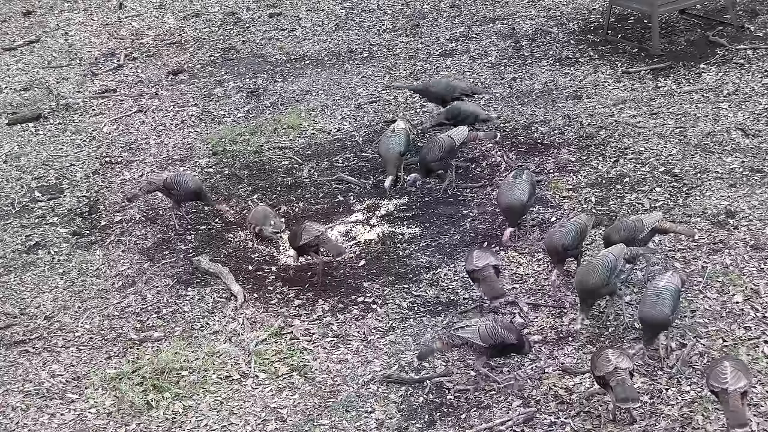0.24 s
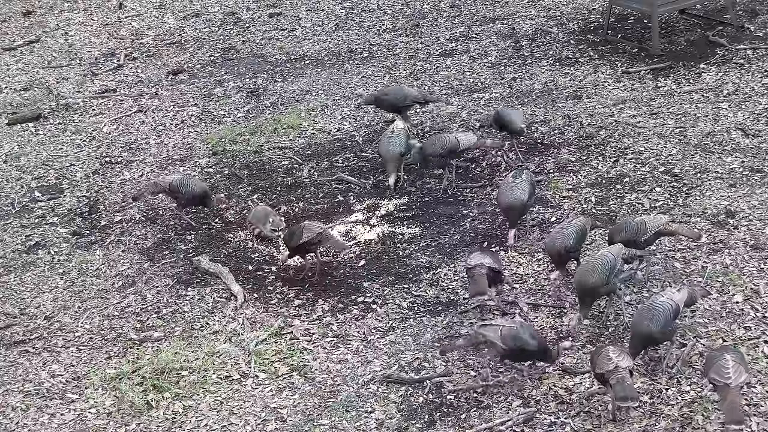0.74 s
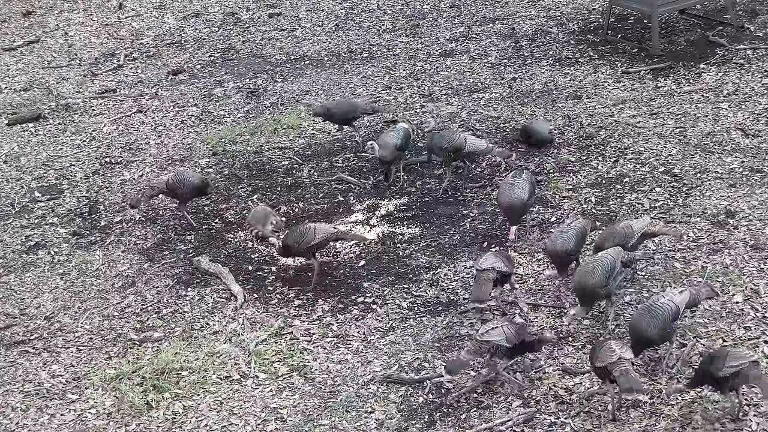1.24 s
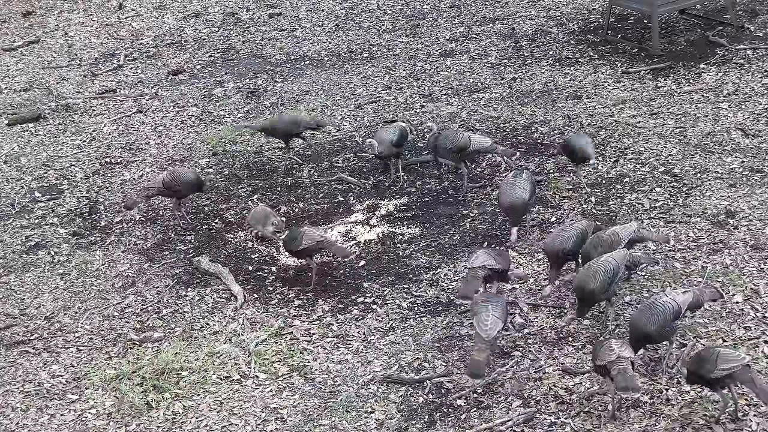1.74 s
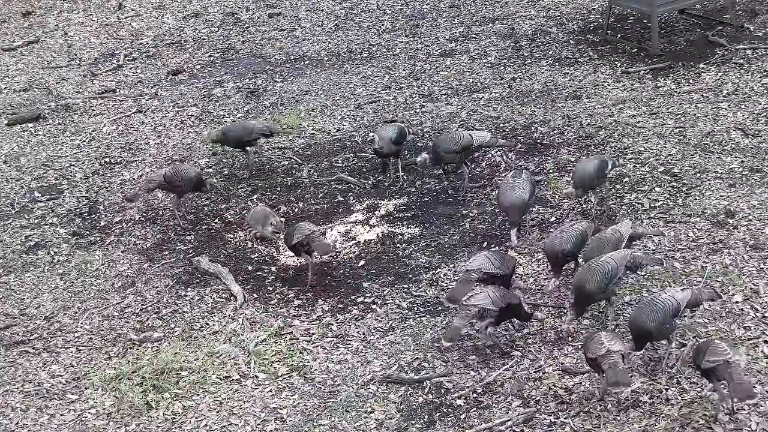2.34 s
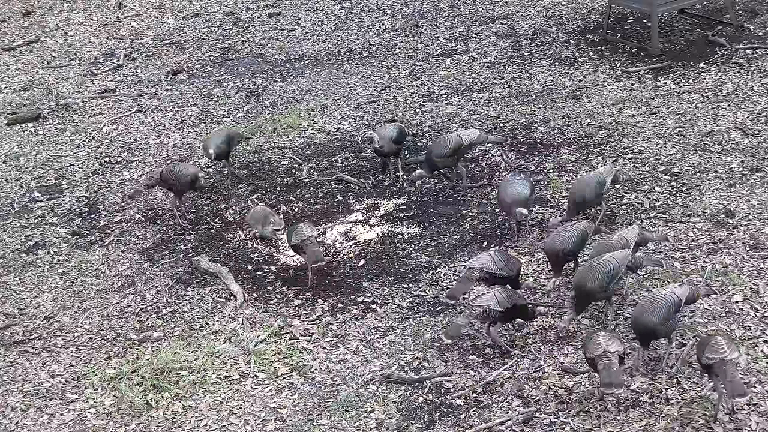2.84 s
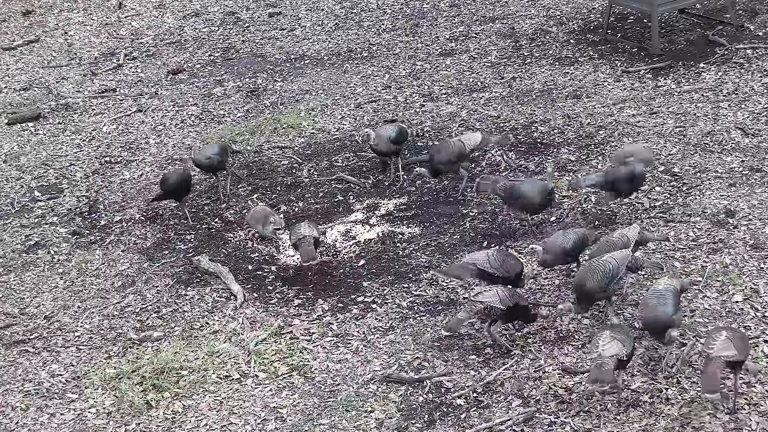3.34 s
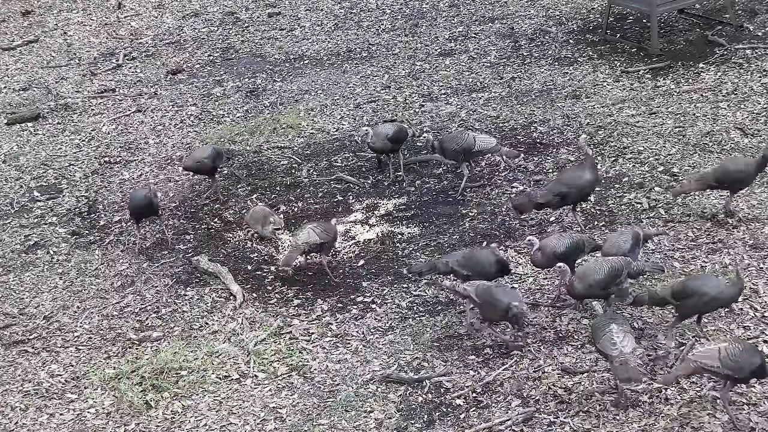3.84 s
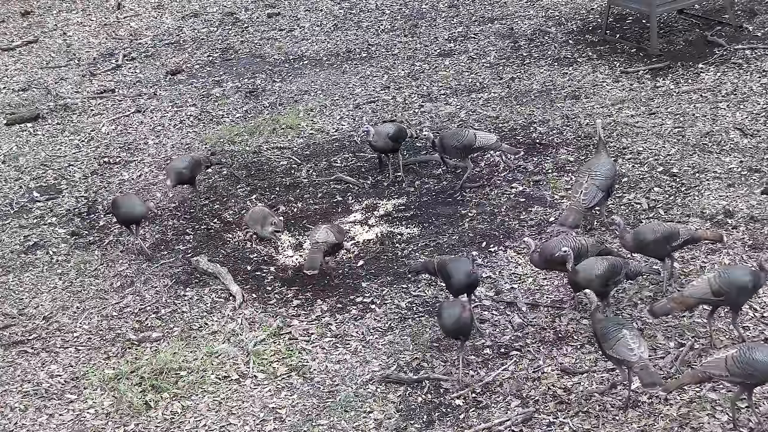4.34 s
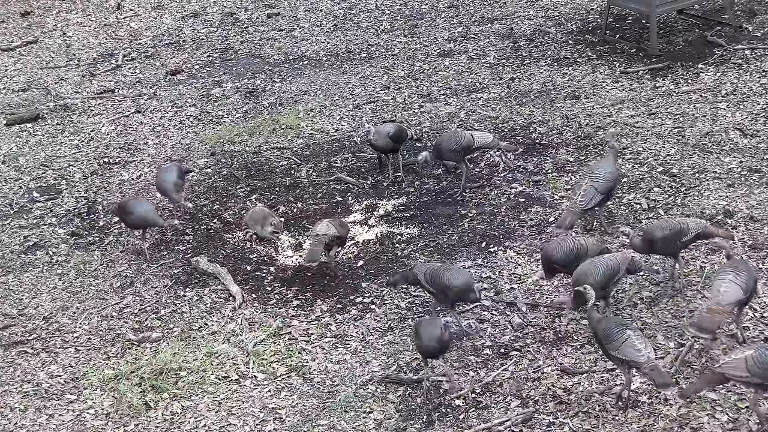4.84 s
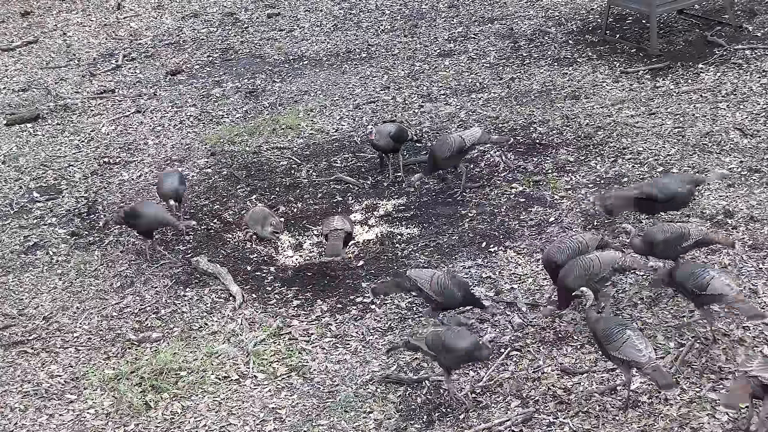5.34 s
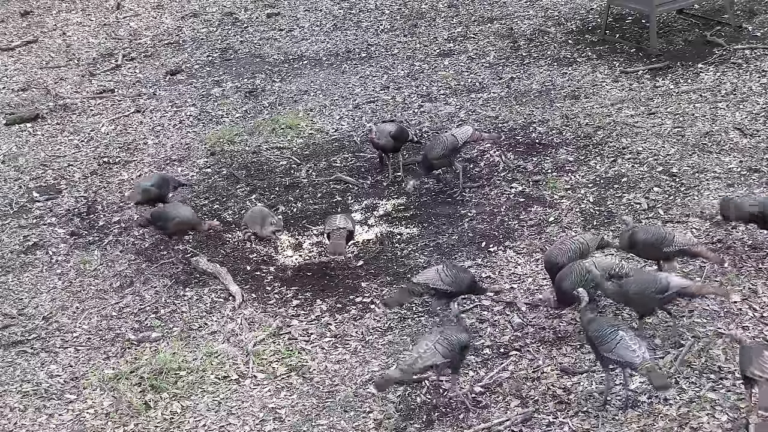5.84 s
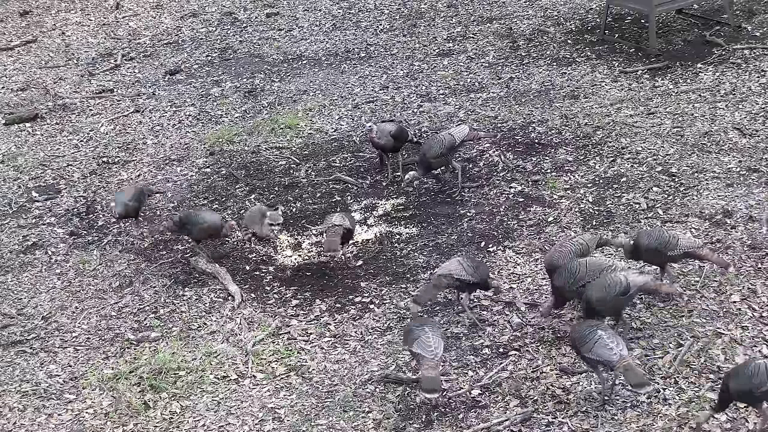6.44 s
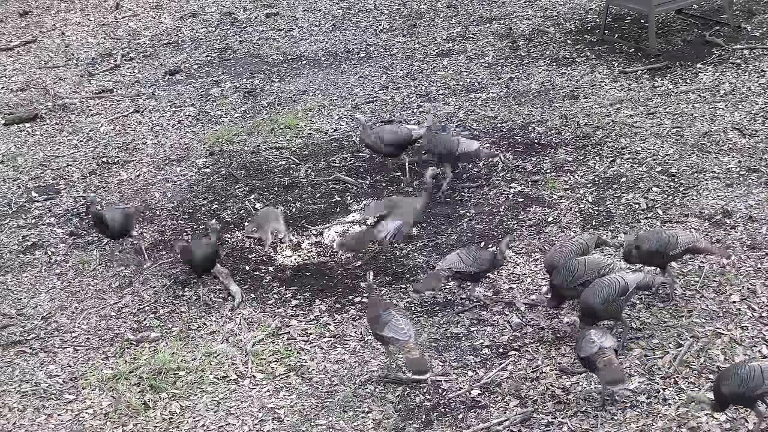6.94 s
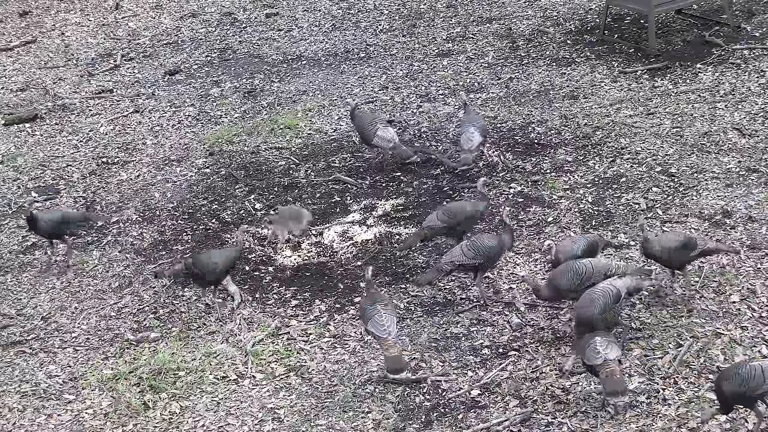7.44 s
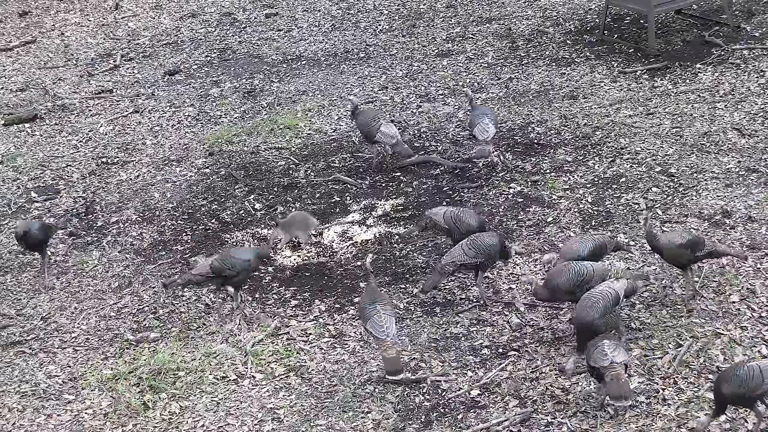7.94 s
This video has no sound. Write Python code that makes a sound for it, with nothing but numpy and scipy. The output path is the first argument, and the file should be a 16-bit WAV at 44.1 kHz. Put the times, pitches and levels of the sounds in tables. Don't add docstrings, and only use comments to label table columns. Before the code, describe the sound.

A feeding turkey flock rustles crisp woodland litter with uneven steps and pecks, quiet hen calls, one quick feather flap, faint low wind.

```python
import sys
import numpy as np
from scipy import signal
from scipy.fft import rfft, irfft
from scipy.io import wavfile

SR = 44100
rng = np.random.default_rng(int(sys.argv[2]) if len(sys.argv) > 2 else 0)


def generate_wav(sig):
    pcm = np.round(np.clip(np.atleast_2d(sig).T, -1, 1) * 32767).astype(np.int16)
    wavfile.write(sys.argv[1], SR, pcm)


def undo_db(level):
    steps = np.asarray(level, float) / 20
    return 10 ** steps


N = 361619

# (frequency [Hz], level [dB per Hz])
LEAF_TONE = [(710, -35), (1200, -2.5), (1490, -6.5), (1790, -0.5), (2180, 0), (2980, 1), (4260, -1.5),
             (4860, 1), (5900, -0.5), (6720, -3), (7660, 0.5), (8530, 0.5), (10500, -10.5), (13500, -7.5),
             (16000, -26)]
# (frequency [Hz], level [dB per Hz])
SOIL_TONE = [(150, -12), (400, -4), (900, -2), (1600, -4.5), (2500, -19.5)]


def evened(x):
    return x / np.sqrt(np.mean(x ** 2) + 1e-20)


def read(points, hz):
    f, value = np.transpose(points)
    return np.interp(np.log(hz + 1), np.log(f + 1), value)


def curve(rows, order):
    rows = np.array(rows)
    return np.interp(np.arange(N) / SR, rows[:, 0], rows[:, order])


def add(mix, s, sound):
    part = mix[round(s * SR):][:len(sound)]
    part += sound[:len(part)]


def coloured(x, points):
    log_gain = np.log(undo_db(read(points, abs(np.fft.fftfreq(4096, 1 / SR)))))
    phase = -signal.hilbert(log_gain).imag
    taps = np.fft.ifft(np.exp(log_gain + 1j * phase)).real[:2048]
    return signal.oaconvolve(x, taps / np.linalg.norm(taps))[:len(x)]


def ring(x, hz, width_hz):
    return signal.lfilter(*signal.iirpeak(hz, hz / width_hz, SR), x)


def crackle(per_s, spread_db, grain_s):
    draw, size, noise = rng.random(N), rng.exponential(1, N), rng.standard_normal(N)
    snaps = (draw < per_s / SR) * undo_db(spread_db * np.minimum(size, 3))
    puffs = signal.lfilter([1], [1, -np.exp(-1 / (grain_s * SR))], snaps)
    return evened(noise * puffs)


def wander(rate_hz):
    hz = np.fft.rfftfreq(N, 1 / SR)
    return evened(irfft(rfft(rng.standard_normal(N)) / (1 + (hz / rate_hz) ** 2), N))


def air():
    # (frequency [Hz], level [dB per Hz])
    rumble = [(15, -46), (25, -13), (43, -6.5), (76, -9.5), (106, -12.5), (178, -14), (273, -19),
              (312, -19.5), (649, -26.5), (743, -28), (1010, -29), (2500, -56.5), (3250, -57), (5500, -120)]
    # (time [s], wind pressure on the microphone [dB], far wash bass [dB])
    gusts = [(0.0, -47, -83), (0.23, -31, -46.5), (0.46, -54, -50.5), (0.75, -35.5, -50), (0.96, -52, -48),
             (1.19, -37.5, -51.5), (1.55, -48, -49.5), (2.03, -39.5, -54.5), (2.35, -54.5, -51.5),
             (2.72, -46, -52), (3.59, -54.5, -48.5), (5.09, -53, -52.5), (6.21, -55, -52), (6.87, -53, -48),
             (7.6, -48, -51.5), (8.2, -49.5, -52.5)]
    # (time [s], level [dB])
    hum_swell = [
        (6.7, -51.5),
        (7.252, -52.5),
        (7.452, -74),
        (7.5, -73),
    ]
    wash, drone, wind = rng.standard_normal((3, N))

    wash = coloured(wash, rumble)
    bass = signal.sosfilt(signal.butter(2, 110, fs=SR, output="sos"), wash)
    wash = undo_db(-49.5) * (wash - bass) + undo_db(curve(gusts, order=2)) * evened(bass)

    hum_level = undo_db(curve([(6.3, -82)] + hum_swell + [(7.6, -86)], order=1) - 2.0)
    drone = hum_level * evened(ring(drone, 157, 72))

    wind = signal.sosfilt(signal.butter(3, [3, 20], "band", fs=SR, output="sos"), wind)
    return wash + drone + undo_db(curve(gusts, order=1)) * evened(wind)


def foliage():
    # (frequency [Hz], level [dB per Hz])
    hiss = [(880, -33), (1500, -3), (1900, -6), (2140, -18), (2320, -3), (3550, -13), (4920, 1.5),
            (6630, -5.5), (8080, -13), (16000, -20.5)]
    return undo_db(-64) * coloured(rng.standard_normal(N), hiss)


def stir():
    # (time [s], level [dB])
    bustle = [(0.0, -85), (0.07, -85), (0.13, -55.5), (1.5, -68), (1.63, -86), (1.72, -60.5), (2.02, -50.5),
              (2.25, -73), (2.8, -64), (3.1, -64), (3.3, -59), (4.4, -61), (6.35, -64), (6.53, -50),
              (7.0, -50), (7.06, -49.5), (7.45, -51), (8.2, -52.5)]
    # (peak time [s], level [dB], build [s], settle [s])
    rakes = [(.11, -54, 0.018, 0.082), (.46, -47, 0.013, 0.18), (0.652, -34, 0.005, 0.0085),
             (0.749, -53.5, 0.16, 0.68), (1.0, -44.5, 0.011, 0.049), (1.31, -47.5, 0.3, 0.27),
             (1.52, -45, 0.016, 0.047), (2.04, -53, 0.044, 0.87), (2.52, -45.5, 0.084, 0.11),
             (2.89, -49.5, 0.04, 0.013), (3.14, -55, 0.066, 0.0091), (3.18, -47, .01, 0.47),
             (3.49, -45.5, 0.034, 1), (3.73, -48, 0.019, 0.016), (3.77, -40.5, 0.012, 0.031),
             (3.995, -44, 0.21, 0.079), (4.36, -45.5, 0.31, 0.079), (4.53, -47, 0.024, 0.058),
             (4.71, -51, 0.2, 0.23), (5.0, -42.5, 0.052, 0.027), (5.15, -49.5, 0.2, 0.041),
             (5.19, -41.5, 0.013, 0.049), (5.56, -45, 0.53, 0.069), (5.95, -45.5, 0.41, 0.058),
             (6.09, -47, 0.16, 0.27), (6.3, -45.5, 0.042, 0.065), (6.94, -59, .02, 0.098),
             (7.29, -46.5, 0.34, 0.17), (7.5, -47.5, 0.041, 0.067), (7.92, -58, 0.015, 0.13)]
    rake_db = 12
    t, power = np.arange(0, N / SR, .002), 0
    for s, db, build, settle in rakes:
        away = np.maximum((s - t) / build, (t - s) / settle)
        power = power + undo_db(2 * (db - rake_db * away))
    return np.sqrt(np.interp(np.arange(N) / SR, t, power) + undo_db(2 * curve(bustle, order=1)))


def steps():
    # (time [s], peak [dB], leaf ring [Hz], thud [dB])
    treads = [(.079, -44, 1810, 2.5), (.1006, -30.5, 6430, -14), (.152, -51, 2500, -3),
              (.248, -42, 1580, -7), (.317, -44, 8170, -2), (.587, -42, 2640, -4),
              (.6452, -24.5, 2660, -11), (1.2335, -29.5, 4870, -9), (1.2565, -33, 2720, -7),
              (1.29, -38, 2840, -4), (1.709, -33.5, 4430, -12), (1.9165, -30.5, 2660, -11),
              (1.947, -41, 2540, -2.5), (3.417, -31.5, 2330, -20), (3.4884, -29, 1750, -10),
              (4.9865, -30.5, 2600, -10), (5.2873, -35, 2800, -10), (5.3212, -27.5, 2770, -8.5),
              (5.3896, -34, 7870, -6.5), (5.8056, -27.5, 6300, -8.5), (6.088, -25.5, 5070, -10),
              (6.319, -37, 2600, -8), (6.5165, -54, 3000, 3), (6.6647, -26.5, 7450, -9),
              (6.7505, -39, 4800, -3), (6.8348, -33, 1730, -1), (6.933, -27.5, 2950, -6.5),
              (7.3102, -29, 5150, -9), (7.6564, -35, 3270, -12)]
    # (time [s], peak [dB], leaf ring [Hz])
    crunches = [(0.4657, -26, 4850), (.9895, -31.5, 3220), (1.097, -39, 7940), (1.149, -37, 7590),
                (1.158, -44, 3220), (1.313, -35, 4390), (2.2064, -31, 2960), (2.5073, -28, 4760),
                (3.026, -49, 5000), (3.8745, -37, 6160), (4.73, -39, 8820), (4.773, -40, 2490),
                (5.2349, -36, 5010), (5.732, -37, 5060), (6.1279, -26.5, 2500), (6.2976, -31.5, 4530),
                (6.4803, -33.5, 2800), (6.96, -31.5, 8720), (7.0443, -34, 8320), (7.07, -23, 3840),
                (7.2893, -36, 8200), (7.924, -26.5, 1850)]
    # (time [s], peak [dB], leaf ring [Hz])
    tosses = [(.385, -46, 5270), (.56, -35, 7470), (1.345, -26, 5300), (1.678, -42.5, 5000),
              (2.0333, -25, 5560), (3.1165, -56, 5200), (3.129, -33.5, 7050), (3.169, -28, 2720),
              (3.334, -27, 8550), (3.58, -31, 2170), (3.719, -26.5, 4200), (3.7613, -31, 3100),
              (3.993, -31, 8250), (4.529, -34, 2820), (4.687, -35.5, 7070), (5.0548, -39, 5340),
              (5.13, -29, 3130), (5.677, -32.5, 8100), (5.855, -28.5, 5170), (6.43, -35.5, 7500),
              (6.8646, -30, 4000), (7.5257, -42, 4300), (7.738, -49, 4480), (7.855, -38, 3000),
              (7.88, -35.5, 2750)]
    # (time [s], peak [dB], leaf ring [Hz], length [s])
    drags = [(0.707, -37, 5820, 0.14), (3.888, -37.5, 5170, 0.095), (4.126, -32.5, 7700, 0.067),
             (4.262, -34.5, 8790, 0.057), (4.353, -36, 8290, 0.045), (4.829, -38.5, 4940, 0.027),
             (5.188, -25.5, 4270, 0.022), (5.488, -33.5, 7320, 0.06), (5.566, -43, 7120, 0.035),
             (5.928, -28.5, 7850, 0.025), (6.25, -37, 2880, .027), (6.714, -28.5, 2500, 0.029),
             (7.12, -28, 1500, 0.071)]
    crunch_thud_db, toss_thud_db, drag_thud_db = -13.5, -44, -14.5
    usual_db, usual_s, shorter_per_db = -30, 0.012, 0.75

    quick = treads + [(*row, crunch_thud_db) for row in crunches]
    quick = quick + [(*row, toss_thud_db) for row in tosses]
    footfalls = []
    for s, db, hz, thud_db in quick:
        length = usual_s * undo_db(shorter_per_db * (usual_db - db))
        footfalls.append((s, db, hz, thud_db, length))
    return footfalls + [(s, db, hz, drag_thud_db, length) for s, db, hz, length in drags]


def under(grains, shape):
    shaped = grains * shape
    return shaped * np.linalg.norm(shape) / (np.linalg.norm(shaped) + 1e-12)


def leaves():
    level = stir() * undo_db(-4.0 + 1.12 * wander(6.4))
    top = level * crackle(per_s=1100, spread_db=-1.0, grain_s=0.003)
    top += level * undo_db(-6.5) * crackle(per_s=300, spread_db=3, grain_s=.0004)
    low = level * undo_db(-8.5) * crackle(per_s=900, spread_db=0.0, grain_s=0.0016)
    snaps = crackle(per_s=3000, spread_db=-1.0, grain_s=0.0012)
    lumps = crackle(per_s=350, spread_db=-1.0, grain_s=0.0051)
    t = np.arange(round(.12 * SR)) / SR
    for s, db, hz, thud_db, length in steps():
        u = t / max(length, .001)
        shape = undo_db(db - 13.5) * (1 - np.exp(-u / 0.14)) * np.exp(-u ** 1.34)
        start = round(s * SR)
        part = slice(start, start + len(t))
        burst = under(snaps[part], shape)
        add(top, s, burst + undo_db(0.5) * ring(burst, hz, 0.37 * hz))
        add(low, s, undo_db(thud_db + 7.0) * under(lumps[part], shape))
    return coloured(top, LEAF_TONE) + coloured(low, SOIL_TONE)


def hens():
    # (time [s], length [s], middle [Hz], glide [Hz], level [dB])
    yelps = [(0.076, .026, 920, -130, -49), (0.1, .042, 790, -290, -46.5), (.2, .014, 830, 260, -53),
             (0.205, 0.039, 965, 0, -48), (.238, .018, 770, -240, -57), (.951, .014, 760, 400, -50),
             (.957, .028, 1060, 200, -44), (.979, .018, 1170, 60, -50), (.994, .032, 1010, -240, -50),
             (1.144, .013, 1050, 250, -47), (1.19, .02, 980, 160, -51), (1.22, .034, 1060, 300, -49),
             (1.586, 0.05, 950, 60, -50.5), (1.662, .017, 893, -22, -56), (3.34, .032, 850, -170, -54),
             (3.385, .05, 720, -150, -55), (4.957, .017, 940, 12, -54), (5.035, 0.022, 578, -50, -49),
             (5.04, .024, 1145, -200, -56.5), (8.164, .016, 930, 10, -52)]
    # (time [s], length [s], middle [Hz], glide [Hz], level [dB])
    purr = [
        (1.207, 0.015, 880, 60, -48),
        (1.258, .016, 1020, -120, -53),
        (1.276, .017, 980, 20, -48),
        (1.296, 0.022, 763, 60, -52),
        (1.312, 0.0089, 820, 80, -56),
        (1.32, 0.019, 865, -20, -50),
        (1.344, 0.015, 845, -20, -49),
        (1.358, .03, 720, -20, -52),
        (1.381, .016, 630, -120, -54),
        (1.394, 0.022, 740, 150, -56),
    ]
    # (time [s], length [s], middle [Hz], glide [Hz], level [dB])
    clucks = [
        (6.706, .007, 2120, -100, -47),
        (6.7988, .004, 2520, -100, -37),
        (6.8055, .003, 480, 0, -40),
        (6.814, .0032, 2480, -100, -43),
        (6.8358, .0072, 950, -300, -34),
        (6.8432, .003, 760, 0, -33),
        (6.852, .006, 760, -100, -42),
        (6.933, .006, 2900, -100, -40),
    ]
    arch_hz_per_s = 2700
    cluck_fade_db = -4
    out, unsteady = np.zeros(N), wander(120)
    for k, (s, length, middle_hz, glide_hz, db) in enumerate(clucks + yelps + purr):
        u = np.linspace(-1, 1, round(length * SR))
        hz = middle_hz + u * glide_hz / 2 - u ** 2 * arch_hz_per_s * length
        turn = 2 * np.pi * np.cumsum(hz) / SR
        if k < len(clucks):
            shape = signal.windows.tukey(len(u), .2) * undo_db(cluck_fade_db * u / 2)
        else:
            shape = signal.windows.tukey(len(u), .6)
        tone = np.sin(turn) + undo_db(-30) * np.sin(2 * turn)
        add(out, s, undo_db(db + .4) * shape * tone)
    return out * undo_db(1.3 * unsteady)


def snap(noise, dull):
    puff = noise * np.exp(-np.arange(len(noise)) / 14)
    click = signal.lfilter([1], [1, -np.clip(dull, -.8, .9)], puff)
    return click / np.linalg.norm(click)


def pecks():
    # (time [s], peak [dB])
    beaks = [(.3202, -30), (.4494, -44), (.4672, -28), (.6519, -32), (1.0011, -33), (1.1099, -40),
             (1.2346, -35), (1.3453, -34), (2.0323, -32), (2.3476, -45), (2.4405, -40), (3.3362, -31),
             (3.7628, -35), (3.9598, -37), (4.2636, -34), (4.8319, -38), (4.9177, -41), (5.1456, -31),
             (5.1855, -31), (5.2349, -36), (5.4001, -35), (5.4619, -29), (5.887, -37), (6.097, -36),
             (6.4297, -29), (6.7076, -32), (7.0738, -35), (7.4689, -39), (7.9268, -35), (.195, -43),
             (.2493, -40), (.389, -38), (.498, -37), (.5125, -38), (.5621, -37), (.5896, -38), (.7148, -34),
             (.8619, -38), (1.3169, -34), (1.476, -42), (1.502, -38), (2.2089, -33), (2.5087, -31),
             (2.8554, -40), (2.8818, -42), (3.4057, -36), (3.709, -38), (3.724, -32), (3.776, -30),
             (3.532, -34), (3.9909, -33), (4.1321, -34), (4.2343, -36), (5.1897, -29), (5.5599, -34),
             (3.8746, -37)]
    # (time [s], peak [dB])
    twigs = [(3.4884, -30), (3.5827, -33), (5.2874, -33), (5.305, -38), (5.347, -35), (5.4135, -35),
             (6.404, -38), (6.5175, -32), (6.836, -34), (7.1127, -34), (7.1292, -31)]
    beak_dull, twig_dull = -.3, .88
    first = [(s, -46.5 - 0.3 * (db + 30)) for s, db, *rest in steps()]
    ticks = [(*row, beak_dull) for row in beaks + first]
    ticks += [(*row, twig_dull) for row in twigs]
    out = np.zeros(N)
    for (s, db, dull), noise in zip(ticks, rng.standard_normal((len(ticks), 400))):
        add(out, s, undo_db(db + 11.5) * snap(noise, dull))
    return coloured(out, LEAF_TONE)


def push(hz, fade):
    t = np.arange(800) / SR
    return -np.sin(2 * np.pi * hz * t) * np.exp(-t * hz * fade)


def knocks():
    # (time [s], level [dB], pitch [Hz])
    soil_knocks = [(0.154, -35, 900), (.3205, -41, 560), (3.2797, -35, 400), (3.4255, -40, 557),
                   (3.4418, -41, 1020), (3.4455, -42, 430), (3.479, -37, 950), (3.488, -34, 564),
                   (3.4955, -43, 624), (3.531, -39, 523), (6.8213, -38, 390), (6.8385, -30, 605)]
    out = np.zeros(N)
    for s, db, hz in soil_knocks:
        add(out, s, undo_db(db) * push(hz, fade=.7))
    return out


def wing():
    # (time [s], snap [dB], air push [dB], push pitch [Hz])
    feathers = [(3.2200, -43, -33, 900), (3.2315, -50, -36, 950), (3.2452, -40, -25, 750),
                (3.2458, -50, -23, 330), (3.2463, -36, -20, 900), (3.2497, -28, -19, 1150),
                (3.2503, -40, -20, 420), (3.2528, -40, -22, 950), (3.2546, -27, -28, 1500),
                (3.2551, -50, -19, 380), (3.2590, -27, -24, 1100), (3.2635, -29, -24, 1200),
                (3.2648, -30, -11, 1050), (3.2682, -31, -21, 900), (3.2803, -42, -36, 600),
                (3.2890, -46, -33, 950)]
    out = np.zeros(N)
    for s, snap_db, push_db, hz in feathers:
        slap = coloured(snap(rng.standard_normal(800), .7), LEAF_TONE)
        shove = push(hz, 1.25) + .2 * push(1900, .66)
        add(out, s, undo_db(snap_db + 13.5) * slap + undo_db(push_db - 1.5) * shove)
    after = np.arange(round(.25 * SR)) / SR
    ruffle = crackle(per_s=700, spread_db=-2.0, grain_s=0.002)[:len(after)]
    add(out, 3.25, undo_db(-49) * np.exp(-after / .1) * coloured(ruffle, SOIL_TONE))
    return out


def scattered(x, t60s, delay_s):
    taps = np.zeros(SR // 2)
    at = np.arange(round(delay_s * SR), SR // 2 - 20, 20)
    taps[at + rng.integers(0, 20, len(at))] = rng.choice([-1., 1.], len(at))
    hz, t, z = signal.stft(taps, SR, nperseg=256)
    fading = undo_db(-60 * t / read(t60s, hz)[:, None])
    tail = signal.istft(z * fading, SR, nperseg=256)[1]
    return signal.oaconvolve(x, tail / np.linalg.norm(tail))[:N]


def scene():
    # (frequency [Hz], t60 [s])
    wood = [(300, 0.42), (1000, 0.25), (4000, 0.55), (12000, 0.25)]
    # (frequency [Hz], level against the sum [dB])
    ports = [(60, -42.5), (150, -40.5), (380, -27.5), (950, -28), (2380, -26.5), (5980, -34), (15000, -16)]
    flock = leaves() + pecks() + hens() + wing() + knocks()
    mid = flock + undo_db(-15) * scattered(flock, wood, .009) + foliage() + air()
    smeared = scattered(mid, [(100, .02), (10000, .02)], 0)
    side = irfft(rfft(smeared) * undo_db(read(ports, np.fft.rfftfreq(N, 1 / SR))), N)
    return np.array([mid + side, mid - side])


def band_limit(x):
    return signal.sosfilt(signal.butter(12, 16470, fs=SR, output="sos"), x)


def record(dry):
    edge = signal.firwin(511, 15900, window=("kaiser", 9), fs=SR)
    mix = signal.oaconvolve(dry, edge[None], "same")
    return band_limit(mix)


dry = scene()
out = record(dry)
generate_wav(out)
```